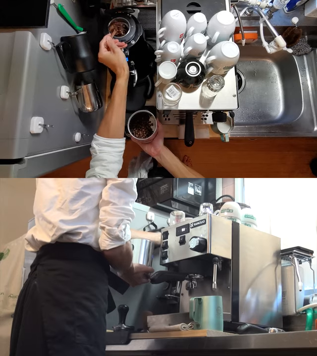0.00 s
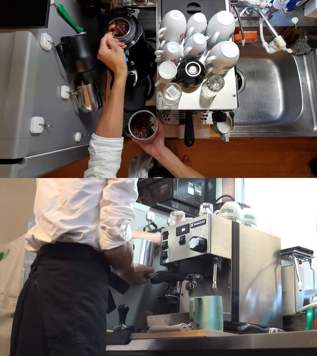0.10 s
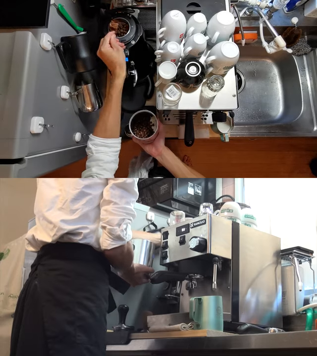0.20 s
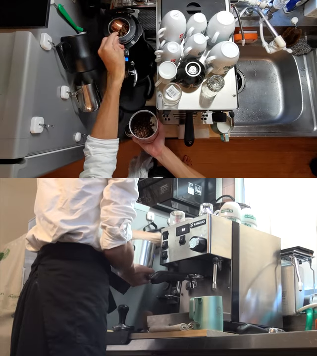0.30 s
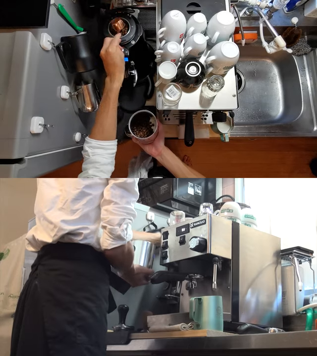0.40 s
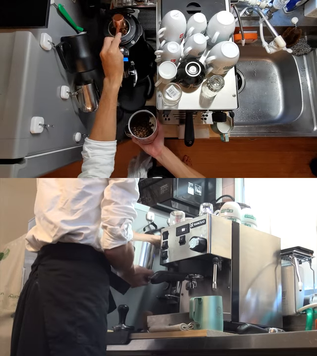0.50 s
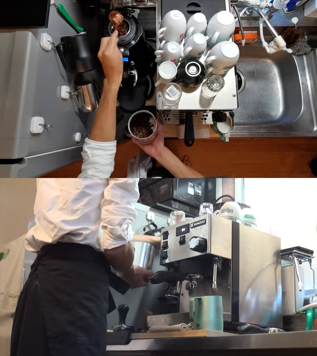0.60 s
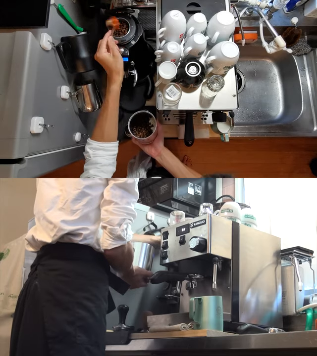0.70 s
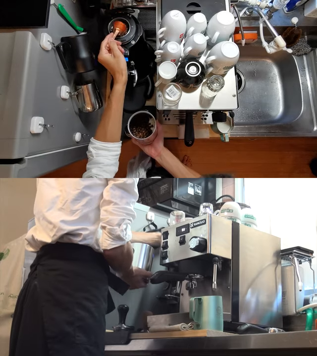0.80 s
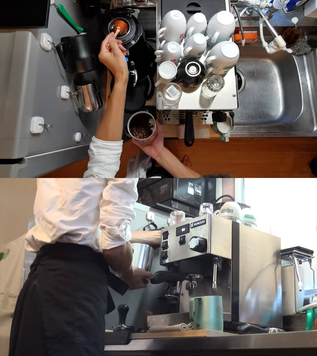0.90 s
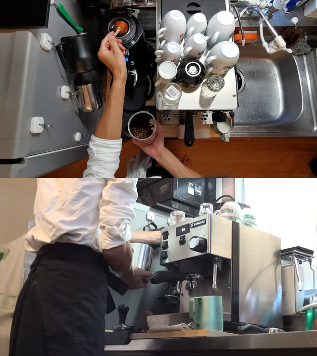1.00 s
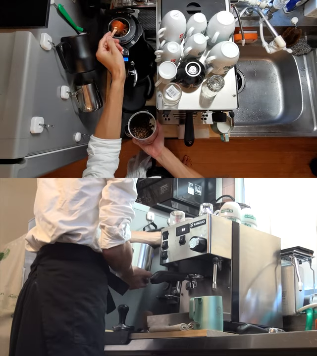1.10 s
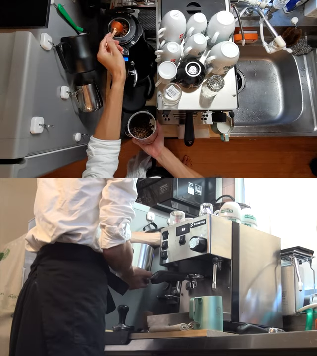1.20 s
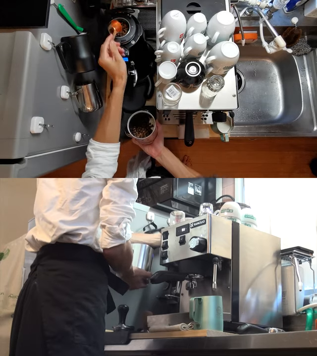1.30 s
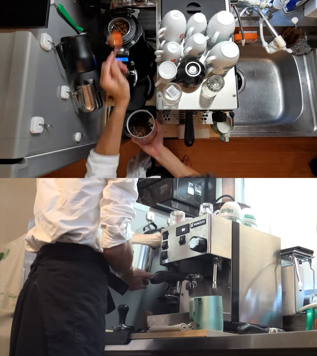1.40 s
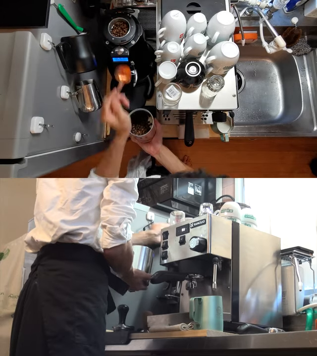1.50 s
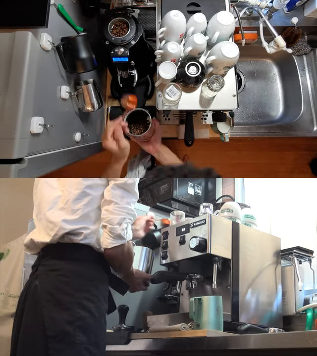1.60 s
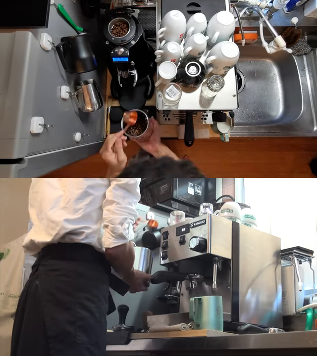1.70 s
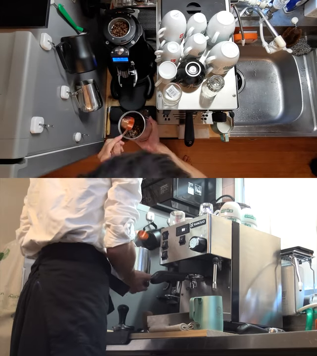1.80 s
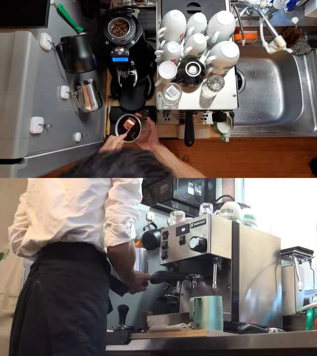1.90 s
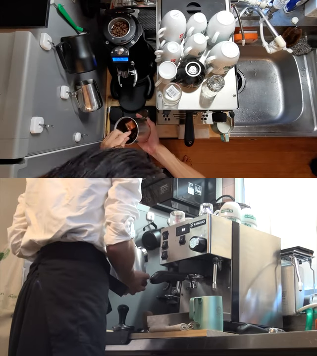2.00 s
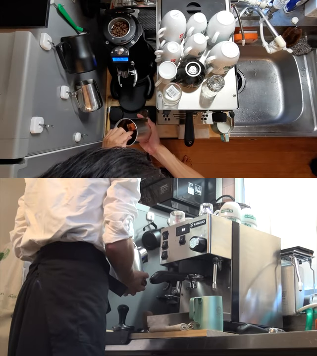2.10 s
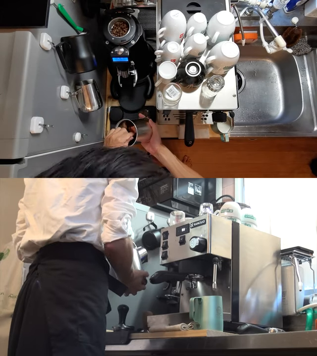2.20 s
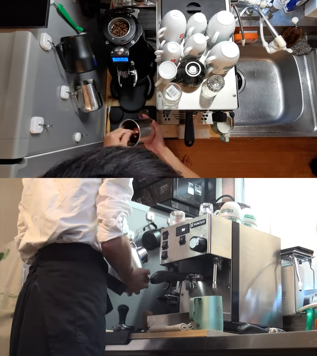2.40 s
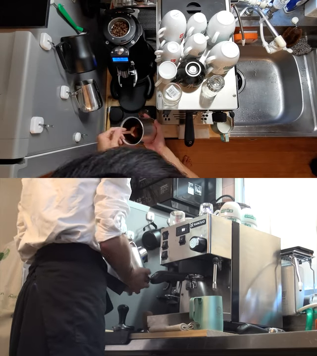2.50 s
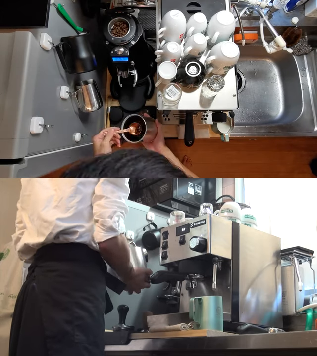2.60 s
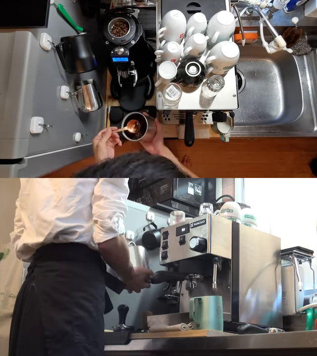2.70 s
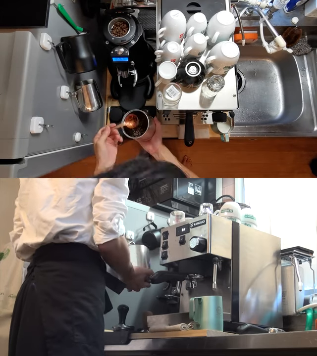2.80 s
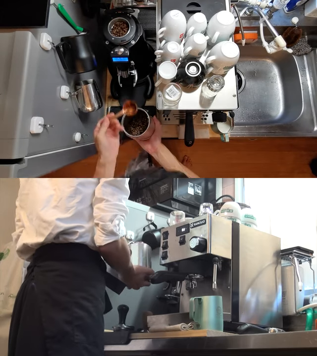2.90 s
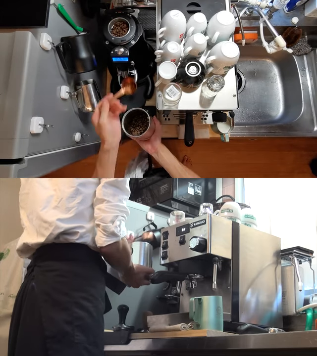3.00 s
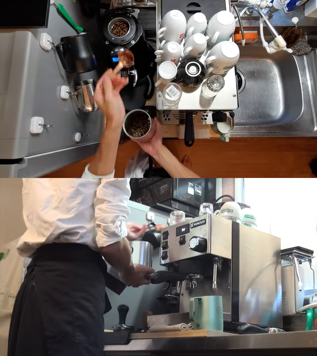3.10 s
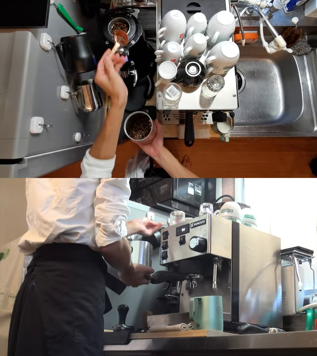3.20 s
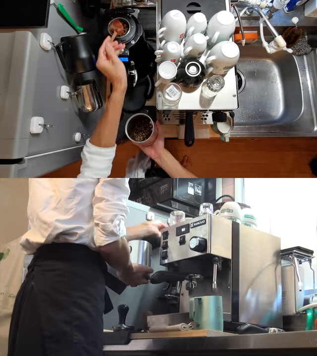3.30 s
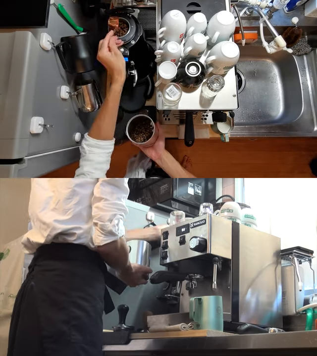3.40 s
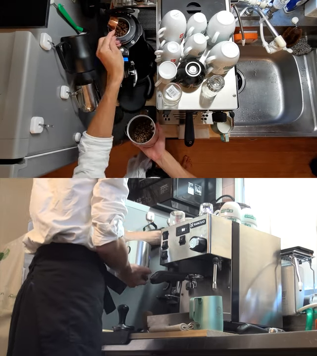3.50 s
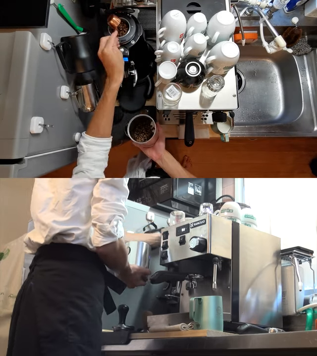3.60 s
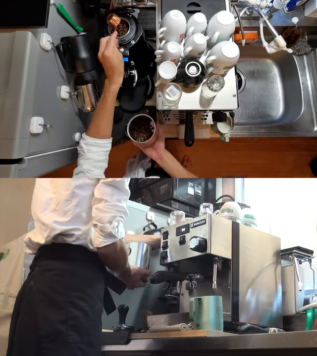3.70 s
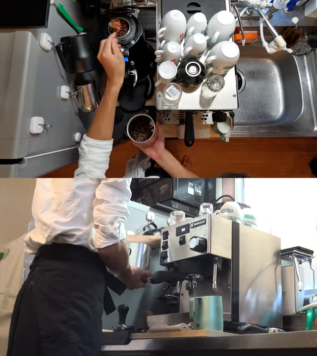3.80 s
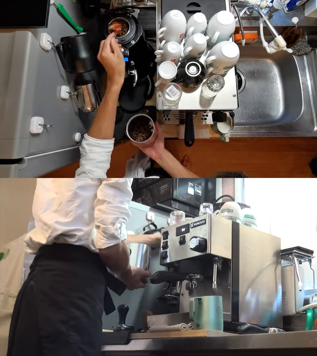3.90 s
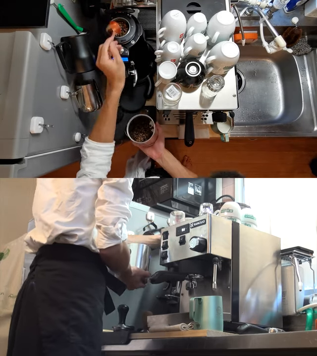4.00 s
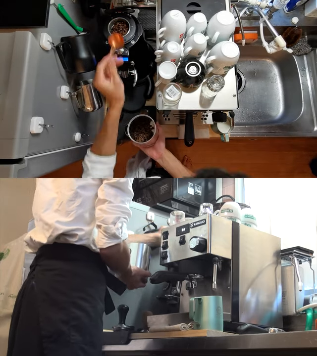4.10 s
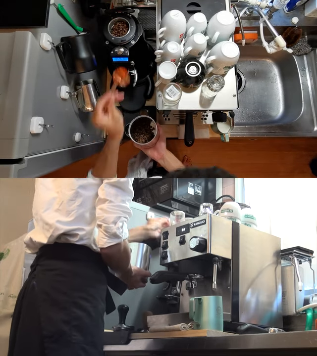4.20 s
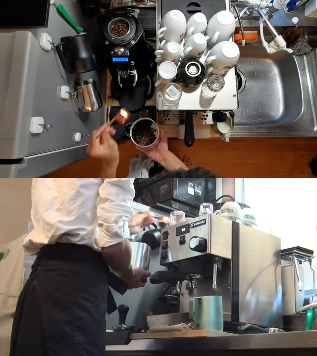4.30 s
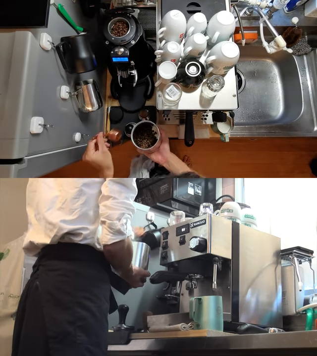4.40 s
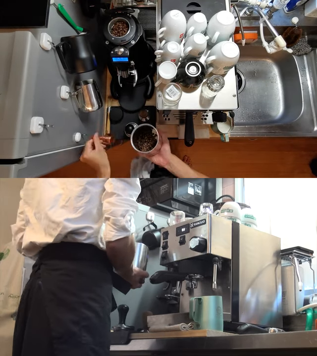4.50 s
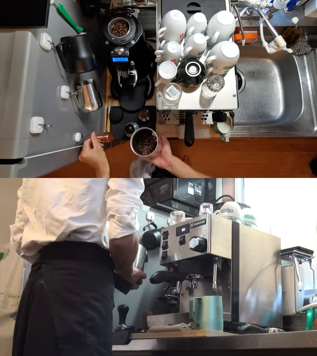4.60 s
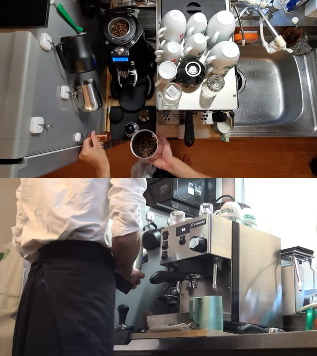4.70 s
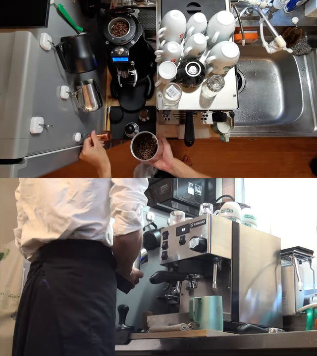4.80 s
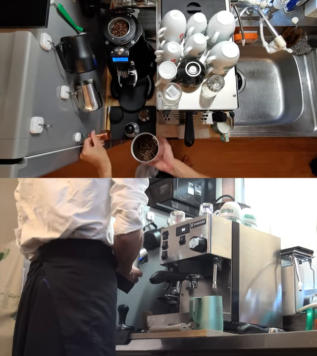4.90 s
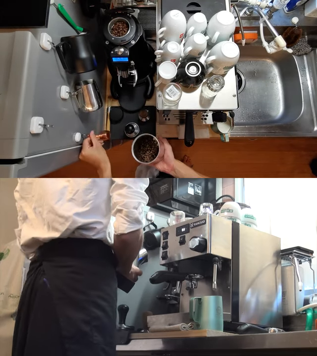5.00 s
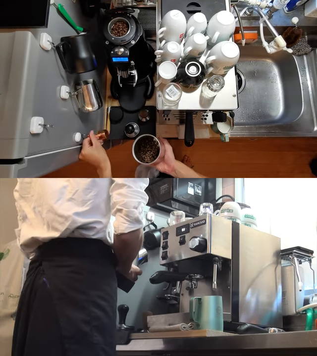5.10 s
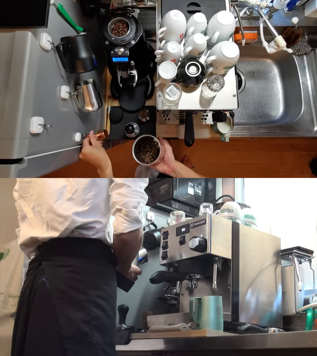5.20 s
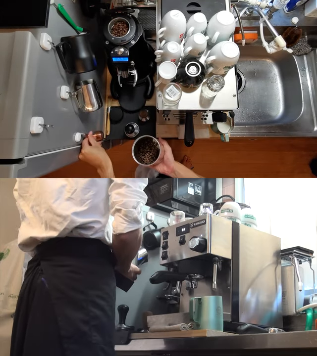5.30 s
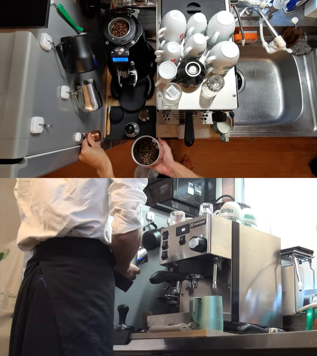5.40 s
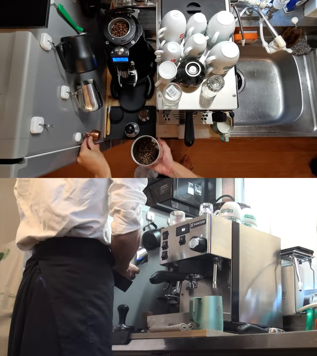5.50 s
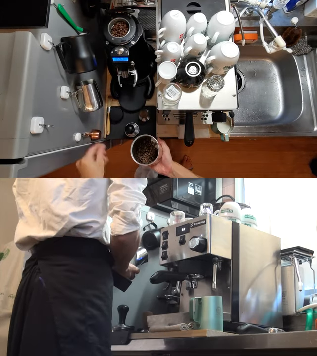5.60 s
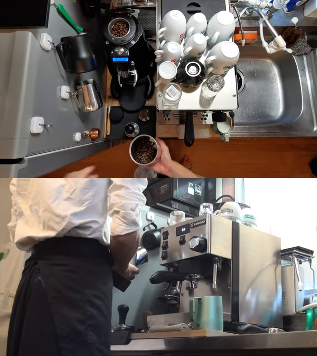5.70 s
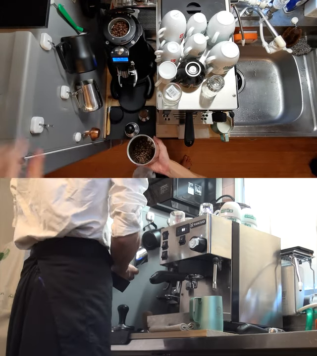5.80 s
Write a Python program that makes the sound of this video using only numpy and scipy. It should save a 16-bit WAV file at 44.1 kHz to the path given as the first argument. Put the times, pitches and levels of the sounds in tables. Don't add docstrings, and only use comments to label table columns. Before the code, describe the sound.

In a small hard-walled kitchen over a low machine rumble, a spoon knocks a plastic hopper and beans patter in. After a quiet gap with faint clinks, it digs crunchily into beans in a steel cup, rings on leaving, tips a faint second load, then cup and spoon are set down with a bouncing clatter. Close stereo microphones, short room echo.

```python
import sys
import numpy as np
from scipy import signal
from scipy.fft import rfft, irfft, next_fast_len
from scipy.io import wavfile
from scipy.ndimage import uniform_filter1d

SR = 44100
rng = np.random.default_rng(int(sys.argv[2]) if len(sys.argv) > 2 else 0)


def level_to_linear(level):
    exponent = np.asarray(level, float) / 20
    return 10 ** exponent


def waveform_to_disk(signal):
    frames = np.transpose(np.atleast_2d(signal))
    scaled = np.clip(frames, -1, 1) * 32767
    samples = np.round(scaled).astype(np.int16)
    wavfile.write(sys.argv[1], SR, samples)


N = 256220


def evened(x):
    return x / np.sqrt(np.mean(x ** 2) + 1e-20)


def read(points, hz):
    f, value = np.transpose(points)
    return np.interp(np.log(hz + 1), np.log(f + 1), value)


def add(mix, s, sound, pan_db):
    late = int(rng.integers(-1, 2))
    for ear, sign in enumerate((0.5, -0.5)):
        part = mix[ear, round(s * SR + sign * late):][:len(sound)]
        part += sound[:len(part)] * level_to_linear(sign * pan_db)


def resonate(x, hz, width):
    b, a = signal.iirpeak(min(hz, SR / 2.2), hz / width, SR)
    return signal.lfilter(b, a, x)


def ring(modes, blow=0.0001, rattle=0.19, stray=0.0091, uneven_db=2.5):
    hz, db, t60 = np.transpose(modes)[:, :, None]
    level_luck, pitch_luck = rng.standard_normal((2, len(modes), 1))
    t = np.arange(6000) / SR
    sign = (-1.0) ** np.arange(len(modes))[:, None]
    strength = sign * level_to_linear(db + uneven_db * level_luck - 60 * t / t60)
    free = (strength * np.sin(2 * np.pi * hz * (1 + stray * pitch_luck) * t)).sum(0)
    free *= 1 - np.exp(-t / blow)
    contact = rattle * rng.standard_normal(1000) * np.exp(-t[:1000] / 0.004) / np.sqrt(0.00061 * SR)
    contact[0] = 1
    return signal.fftconvolve(free, contact)


def crack(hz, share, last_s):
    t = np.arange(900) / SR
    burst = rng.standard_normal(len(t)) * np.exp(-t / last_s) * (1 - np.exp(-t / (0.34 * last_s)))
    width = hz * np.clip(1.68 * share, 0.05, 1.6)
    burst = resonate(resonate(burst, hz, width), hz, width)
    return level_to_linear(-5) * burst / abs(burst).max()


# (frequency [Hz], level [dB per Hz])
RUMBLE = [(19, -20), (32, -3.5), (49, -8), (86, -12.5), (129, -21), (160, -16.5), (183, -30), (226, -25),
          (259, -31.5), (288, -30), (750, -30), (1200, -51.5), (1560, -70), (2640, -120)]
# (frequency [Hz], level [dB per Hz])
HISS = [(590, -46), (1000, -12), (1380, -8.5), (2130, -7.5), (2980, -12), (3340, -14), (10100, -20.5),
        (10900, -16), (16000, -20.5)]
# (frequency [Hz], likeness [-1 to 1])
LIKENESS = [(60, 0.93), (180, 0.89), (550, 0.55), (1650, -0.16), (4970, 0.014), (15000, -0.17)]
# (frequency [Hz], left-right [dB])
LEAN = [(60, -1.5), (240, 0), (950, 6.5), (3770, 0.5), (15000, 5.5)]


def rumble():
    patchy_db, rumble_db, hiss_db = 1.6, -53.5, -73
    hz = np.fft.rfftfreq(2048, 1 / SR)
    a, b, c, d, patches = rng.standard_normal((N // 512 + 5, 1025, 5)).T
    patches = evened(uniform_filter1d(uniform_filter1d(patches, 30, 0), 8, 1))
    same = np.clip(read(LIKENESS, hz), -1, 1)[:, None]
    left = a + 1j * b
    right = same * left + np.sqrt(1 - same ** 2) * (c + 1j * d)
    lean = np.array([0.5, -0.5])[:, None, None] * read(LEAN, hz)[:, None]
    z = np.array([left, right]) * level_to_linear(patchy_db * patches + lean)
    out = np.zeros((2, N))
    for shape, db in ((RUMBLE, rumble_db), (HISS, hiss_db)):
        noise = signal.istft(z * level_to_linear(read(shape, hz))[:, None], nperseg=2048, noverlap=1536)[1]
        out += level_to_linear(db) * evened(noise[:, :N])
    return out


# (frequency [Hz], wander [Hz], level [dB])
MOTORS = [(39.15, 3.13, -51.5), (60.05, 4.89, -59)]


def drones():
    out = np.zeros(N)
    for hz, wander_hz, db in MOTORS:
        drift = evened(uniform_filter1d(uniform_filter1d(rng.standard_normal(N), 2500), 2500))
        tone = np.sin(2 * np.pi * np.cumsum(hz + wander_hz * drift) / SR)
        out += level_to_linear(db + 1 + 1.8 * drift[::-1]) * tone
    return out * level_to_linear(np.array([[-0.8], [0.8]]))


# (time [s], level [dB], left-right [dB])
KNOCKS = [
    (0.0849, -26, -1),
    (0.102, -38, 2),
    (0.117, -35, 12),
    (0.2374, -40, 2),
    (0.385, -37, -1),
    (3.7005, -50, -2),
]
# (frequency [Hz], level [dB], time to fade 60 dB [s])
HOPPER = [(653, -22, 0.078), (1050, -9.5, 0.015), (1810, -22, 0.0067), (2190, 0.5, 0.016), (2265, 4, 0.014),
          (2530, -4, 0.012), (2680, -8.5, 0.016), (3720, -2.5, 0.007), (4710, -10.5, 0.011)]


def hopper_knocks():
    out = np.zeros((2, N))
    for s, db, pan in KNOCKS:
        add(out, s, level_to_linear(db - 7) * ring(HOPPER, blow=0.0003, rattle=0.08, stray=0.006, uneven_db=0.6), pan)
    return out


# (time [s], level [dB], centre [Hz], width [share of centre], left-right [dB])
CLACKS = [(0.085, -25.5, 2150, 0.26, 0.5), (0.238, -35.5, 2220, 1, -3), (0.387, -38, 2400, 0.24, 3),
          (.386, -44, 1410, 0.27, 0), (2.425, -54, 810, 0.26, 7), (2.716, -47, 700, 0.076, 16),
          (4.829, -48.5, 1247, 0.15, -7.5), (5.123, -54.5, 950, 0.4, 12), (5.604, -31, 747, 0.16, 17),
          (5.668, -22.5, 1690, 0.3, 3), (5.669, -27, 2500, 0.52, -2), (5.686, -34, 2350, 0.61, 13)]


def clacks():
    out = np.zeros((2, N))
    for s, db, hz, share, pan in CLACKS:
        add(out, s, level_to_linear(db) * crack(hz, share, last_s=0.0034), pan)
    return out


# (time [s], frequency [Hz], level [dB], time to fade 60 dB [s])
PINGS = [(.126, 660, -49, .05), (.222, 3900, -47, .006), (.238, 2440, -47, .03), (.241, 4700, -58, .12),
         (.289, 4730, -64, .2), (.42, 4700, -63, .2), (.62, 3680, -58, .02), (.867, 114, -36, .05),
         (.872, 290, -40, .05), (.877, 1950, -54, .02), (1.038, 4720, -66, .2), (1.042, 290, -42, .06),
         (1.055, 550, -49, .1), (1.08, 2588, -70, .3), (2.308, 11100, -42, .03), (2.321, 11000, -44, .02),
         (2.334, 575, -35, .06), (2.425, 14300, -43, .015), (2.481, 9000, -48, .03),
         (2.545, 10800, -47, .02), (2.637, 10650, -45, .03), (2.643, 12400, -48, .025),
         (2.718, 3590, -31, .014), (2.746, 3590, -42, .015), (2.718, 583, -32, .08),
         (3.005, 14620, -47, .06), (3.61, 2350, -70, .3), (3.65, 5950, -59, .07), (3.71, 4646, -67, .15),
         (4.075, 2680, -72, .2), (4.076, 4710, -70, .12), (4.664, 1900, -50, .05), (4.67, 2120, -54, .04),
         (4.662, 7760, -52, .008), (4.826, 10220, -42, .012), (4.829, 4630, -51, .07),
         (4.83, 2350, -54, .04), (4.831, 265, -46, .09), (5.124, 10800, -51, .08), (5.123, 5300, -58, .04),
         (5.123, 7600, -55, .05), (5.124, 2650, -60, .04), (5.135, 560, -49, .06), (5.326, 15300, -58, .04),
         (5.34, 10100, -59, .06), (5.325, 1215, -56, .1), (5.345, 1200, -53, .1), (5.34, 600, -47, .05),
         (5.39, 3710, -60, .06), (5.39, 470, -52, .06), (5.605, 310, -28, .05), (5.61, 1890, -42, .06),
         (5.678, 555, -35, .05), (5.69, 345, -31, .09), (5.717, 4700, -48, .06)]


def pings():
    out = np.zeros((2, N))
    for s, hz, db, t60 in PINGS:
        cluster = 5 if t60 > 0.11 else 1
        stray = 0.002 * cluster ** 1.3
        modes = [(hz, db + 0.5, t60)] * cluster
        add(out, s, ring(modes, blow=0.0004, rattle=0.2, stray=stray, uneven_db=0), -1.5)
    return out


def bean_clicks():
    per_s, spread_db = 1600, 2.0
    size = level_to_linear(spread_db * np.minimum(rng.exponential(1, (2, N)), 2.9))
    hit = rng.random((2, N)) < per_s / SR
    return size * hit * rng.standard_normal((2, N))


# (start [s], hold [s], fade [dB per s], level [dB], top octave relative level [dB])
POURS = [(0.156, 0.064, 300, -61.5, -2), (0.215, 0.22, 127, -54.5, 7), (0.606, 0.1, 456, -61, 5.5),
         (1.04, 0.078, 115, -67.5, -26), (1.145, 0.062, 190, -63, 2.5), (1.382, 0.017, 288, -66.5, 5),
         (2.303, 0.015, 185, -42, -7), (2.325, 0.35, 702, -42.5, -8.5), (2.727, 0.0018, 896, -51, 4),
         (2.74, .01, 182, -83, -15), (3.695, 0.01, 209, -58.5, 10.5), (4.666, 0.0031, 500, -56, -0.5)]


def pouring_power():
    rise_s = 0.0069
    t, power = np.arange(N) / SR, np.zeros((2, N))
    for s, hold, fade, db, top in POURS:
        rise = np.clip((t - s) / rise_s, 0, 1)
        settle = level_to_linear(-abs(fade) * np.clip(t - s - rise_s - hold, 0, 1))
        power += (rise * settle * level_to_linear(np.array([[db], [db + top]]))) ** 2
    return power


# (frequency [Hz], level [dB per Hz])
BEANS = [(530, -38), (900, -10), (1070, -18), (2070, -0.5), (3150, -0.5), (5210, -1.5), (5970, -3.5),
         (6600, 4), (8000, -8.5), (10400, -18), (17600, -120)]


def tumbling_beans(clicks):
    grain_width, count = 0.3, 10
    kind = rng.integers(0, count, (2, N))
    fast = next_fast_len(N)
    hz = np.fft.rfftfreq(fast, 1 / SR)
    grains = 0
    for k, f in enumerate(np.geomspace(600, 16000, count)):
        grains = grains + rfft(clicks * (kind == k), fast) * np.exp(-(np.log((hz + 1) / f) / grain_width) ** 2)
    body = evened(irfft(grains * level_to_linear(read(BEANS, hz)), fast)[:, :N])
    treble = (hz < 16000) / (1 + (7500 / (hz + 1)) ** 8)
    chips = evened(irfft(grains * treble, fast)[:, :N])
    low, top = np.sqrt(pouring_power() + sliding_power())
    return level_to_linear(np.array([[0.25], [-0.25]])) * (low * body + top * chips)


# (time [s], level [dB], centre [Hz])
HOPPER_TICKS = [(0.186, -42, 8230), (0.224, -30.5, 13400), (0.252, -33, 11100), (0.395, -32, 13400),
                (0.461, -30, 11000), (0.53, -40.5, 13500), (0.715, -38.5, 14600), (1.037, -51, 4710),
                (1.153, -57, 10400), (1.393, -57, 10200), (1.607, -66, 5000), (1.885, -65, 5000)]


def hopper_ticks():
    out = np.zeros((2, N))
    for s, db, hz in HOPPER_TICKS:
        add(out, s, level_to_linear(db) * crack(hz, 0.43, last_s=0.0018), -3)
    return out


# (middle [s], half length [s], level [dB], top octave relative level [dB])
SLIDES = [
    (0.56, 0.078, -64, -20),
    (1.734, 0.16, -75.5, -4.5),
    (3.115, 0.094, -64.5, -13),
    (3.248, 0.072, -70.5, -3),
    (3.684, 0.055, -66, 6),
    (4.485, 0.14, -71, -2),
    (4.637, 0.015, -68, -18),
    (4.75, 0.05, -87, -10),
]


def sliding_power():
    t, power = np.arange(N) / SR, np.zeros((2, N))
    for s, half, db, top in SLIDES:
        swell = level_to_linear(-12 * np.minimum(abs(t - s) / half, 5) ** 2)
        power += (swell * level_to_linear(np.array([[db], [db + top]]))) ** 2
    return power


# (frequency [Hz], level [dB], time to fade 60 dB [s])
COUNTER_DEEP = [(107, -8, 0.042), (124, 1.5, 0.098), (166, -19, 0.11)]
# (frequency [Hz], level [dB], time to fade 60 dB [s])
COUNTER_HIGH = [(1146, -5, 0.013), (1454, -19, 0.013), (1690, 3.5, 0.0074), (1854, -4.5, 0.018),
                (2240, -7.5, 0.018), (2770, -20, 0.028), (3700, -8, 0.0063), (4670, -16, 0.0044)]


def strike_surface(blows, low):
    out = np.zeros((2, N))
    for s, db, deep, upper, pan in blows:
        thud = ring(COUNTER_DEEP, blow=0.016, stray=0.0058, uneven_db=2.8)
        add(out, s, level_to_linear(db + deep - 3) * thud, pan - 7)
        add(out, s, level_to_linear(db - 9) * ring(low, blow=0.00018, rattle=0.25, stray=0.011, uneven_db=0.5), pan)
        panel = ring(COUNTER_HIGH, blow=0.00017, rattle=0.25, stray=0.006, uneven_db=1.2)
        add(out, s, level_to_linear(db + upper - 3.5) * panel, pan)
    return out


# (time [s], level [dB], thud relative level [dB], upper relative level [dB], left-right [dB])
THUMPS = [(0.871, -39, 11, -30, 4), (1.04, -41, -3, -14, 4), (4.827, -41.5, -23, -13, 2.5),
          (5.118, -44, -13, -13, -3), (5.131, -41, -13, -23, 4.5), (5.15, -54, -8, -21, 0),
          (5.185, -48, -13, -23, 0), (5.216, -52, -13, -27, -1), (5.324, -53.5, -30, -15, -5),
          (1.075, -40.5, -11, -27, 2), (.905, -54, -20, -33, 7)]
# (frequency [Hz], level [dB], time to fade 60 dB [s])
COUNTER_LOW = [(188, -11, 0.075), (283, 3.5, 0.079), (343, 2, 0.051), (504, -2.5, 0.022), (535, -8.5, 0.16),
               (561.5, -2, 0.069), (700, -9.5, 0.078), (790, -11, 0.059), (970, -28, 0.033)]


def counter_thumps():
    return strike_surface(THUMPS, COUNTER_LOW)


# (time [s], main ring level [dB], upper rings relative level [dB], low ring relative level [dB])
CLINKS = [(1.0382, -62, -10, -3), (1.1534, -62, 7, -15), (1.1802, -51.5, -4, -25), (1.2557, -41, -11, -39),
          (1.3768, -60, 0, -19), (1.3961, -50, 3, -31), (1.4151, -46, -4, -32), (1.4495, -69, 13, -23),
          (1.8844, -82, -9, -3), (2.2998, -45.5, -14, -16), (2.81, -37.5, -40, -31),
          (2.8374, -34.5, -20, -27), (2.8644, -65, -17, -33), (3.0051, -32, -16, -32),
          (3.0445, -42, -13, -34), (3.062, -41, -14, -33), (3.1009, -57, -18, -24), (3.2011, -56, -18, -22),
          (3.256, -49, -30, -27), (3.602, -65, -2, -6), (3.6476, -75, -7, -6), (4.0746, -61.5, -6, -11),
          (4.8279, -38, -4, -37), (4.8474, -37, -28, -34), (5.124, -47, 0, -15), (5.3263, -46, -25, -32),
          (5.3921, -60, -20, -2), (5.618, -37.5, -29, -15), (5.64, -42, -32, -20), (5.671, -26, -16, -27),
          (5.684, -26.5, -17, -30), (5.732, -52, -17, -25)]
# (frequency [Hz], level [dB], time to fade 60 dB [s], ring 0 main, 1-2 upper, 3 low)
SPOON = [(6481, 0, .08, 0), (6535, -9, .06, 0), (5930, -22, .05, 0), (7600, -23, .05, 0),
         (10230, 0, .08, 1), (9884, -11, .05, 1), (10480, -5, .05, 1), (14620, 0, .07, 2),
         (15250, -11, .05, 2), (4660, -4, .04, 3), (2360, -10, .03, 3), (9100, -19, .04, 3)]


def spoon_clinks():
    grip = 0.7
    out = np.zeros((2, N))
    for s, db, upper, low in CLINKS:
        shares = [0, upper, upper - 7, low]
        modes = [(f, d + db - 5.5 + shares[int(k)], t60 * grip) for f, d, t60, k in SPOON]
        add(out, s, ring(modes, blow=0.00018, rattle=0.14, stray=0.0024, uneven_db=-3.6), 2.5)
    return out


# (time [s], level [dB], centre [Hz], left-right [dB])
CUP_TICKS = [(2.2568, -56, 5100, -2), (2.308, -44, 4940, -7), (2.3243, -30, 6260, -9),
             (2.3327, -24, 3590, -2), (2.3635, -33, 11000, 0), (2.4249, -26, 4570, -8),
             (2.48, -38, 11000, -4), (2.5088, -26, 13100, -2), (2.5312, -26, 5900, -7),
             (2.534, -24, 11000, 0), (2.343, -27, 12500, -2), (2.367, -27.5, 7950, 1), (2.44, -34, 5000, 1),
             (2.495, -30, 7500, -3), (2.5932, -31, 5500, 0), (2.6361, -31, 6000, -1),
             (2.6424, -24, 3740, -2), (2.6974, -48, 3500, -5), (2.7172, -22, 4300, 2.5),
             (2.7245, -38, 14000, -8), (2.7985, -44, 6200, -8), (2.837, -54, 10000, -20),
             (2.9102, -53, 14000, -2), (2.9311, -57, 8900, -12), (2.958, -52, 9000, 0),
             (2.9661, -48, 11900, -4), (3.003, -43.5, 13900, -4), (3.001, -53.5, 3440, -1),
             (3.033, -48, 12500, -5), (3.047, -43, 11000, 0)]


def cup_ticks():
    out = np.zeros((2, N))
    for s, db, hz, pan in CUP_TICKS:
        add(out, s, level_to_linear(db) * crack(hz, 0.64, last_s=0.0034), pan)
    return out


# (time [s], level [dB])
CUP_HUM = [(2.29, -55), (2.335, -38.5), (2.398, -86), (2.424, -35), (2.5, -63), (2.702, -47), (2.726, -73),
           (2.802, -77), (2.88, -101)]


def cup_hum(clicks):
    hum = evened(resonate(resonate(clicks[0], 606, 124), 605, 130))
    s, db = np.transpose(CUP_HUM)
    strength = level_to_linear(np.interp(np.arange(N) / SR, s, db - 6.5, -150, -150))
    return strength * hum * level_to_linear(np.array([[3.0], [-6.0]]))


# (time [s], cup air level [dB], wall relative level [dB], left-right [dB])
DIGS = [
    (2.334, -39, 6, -2.5),
    (2.364, -63, -7, -13.5),
    (2.424, -27, -7, -2.5),
    (2.534, -38.5, -2, -4),
    (2.59, -38.5, -15, -2),
    (2.644, -34, 3, 1.5),
    (2.691, -43, 6, -5),
    (2.719, -40, 19.5, -21),
]
# (frequency [Hz], level [dB], time to fade 60 dB [s])
CUP_AIR = [(571, -4.5, 0.041), (646, -17, 0.044), (470, -26, 0.06)]
# (frequency [Hz], level [dB], time to fade 60 dB [s])
CUP_WALL = [(1650, 1.5, 0.0069), (2160, 0, 0.0063), (3590, -23, 0.0035), (5000, -3, 0.0027),
            (5500, 2, 0.0057)]


def cup_digs():
    out = np.zeros((2, N))
    for s, db, wall, pan in DIGS:
        add(out, s, level_to_linear(db + 1.5) * ring(CUP_AIR, blow=0.0012, stray=0.008, uneven_db=1), pan + 9)
        add(out, s, level_to_linear(db + wall - 8) * ring(CUP_WALL, blow=0.00032, rattle=0.42, stray=0.0086), -1.5)
    return out


# (time [s], level [dB], centre [Hz], left-right [dB])
LATE_TICKS = [(3.602, -53, 5860, -7), (3.704, -39.5, 8340, -10), (3.7141, -40, 12900, 4),
              (4.073, -54, 4920, -16), (4.662, -31, 5270, -0.5), (4.8174, -41, 6000, -10),
              (4.8274, -28.5, 6770, 8), (5.0094, -64, 6520, 2.5), (5.1215, -33.5, 7400, -5.5),
              (5.3255, -44.5, 6800, -6), (5.325, -65, 13600, -7), (5.39, -45, 5960, -2),
              (5.6038, -34.5, 8500, -2), (5.668, -23.5, 6800, -10), (5.6705, -24, 12000, 2),
              (5.673, -28, 9800, 14)]


def late_ticks():
    out = np.zeros((2, N))
    for s, db, hz, pan in LATE_TICKS:
        add(out, s, level_to_linear(db) * crack(hz, 0.67, last_s=0.00067), pan)
    return out


# (time [s], level [dB], thud relative level [dB], upper relative level [dB], left-right [dB])
LANDINGS = [
    (5.604, -19.5, -11, -7, -3),
    (5.622, -28.5, -20, -8, 0),
    (5.669, -21.5, -17, -2.5, 2),
    (5.676, -29.5, -20, -24, 3),
    (5.684, -29, -25, -10, 3),
    (5.697, -31, -27, -22, -1),
]
# (frequency [Hz], level [dB], time to fade 60 dB [s])
BOARD = [(189, -8, 0.13), (226, -6.5, 0.16), (282, -4.5, .05), (341, 2, 0.11), (462, -7, 0.053),
         (522, -1.5, 0.039), (602, -4.5, .06), (700, -9, 0.097), (785, -6, .045), (875, -11, 0.076),
         (1000, -15, 0.044)]


def board_landings():
    return strike_surface(LANDINGS, BOARD)


# (frequency [Hz], level [dB], time to fade 60 dB [s])
SCOOP = [(13120, 0, .07), (15060, 3, .1), (10690, -12, .05), (12280, -15, .06), (8100, -16, .07),
         (11060, -16, .07)]


def spoon_drop():
    out = np.zeros((2, N))
    add(out, 5.669, level_to_linear(-37) * ring(SCOOP, blow=0.0025, stray=0.0008, uneven_db=0), -2.5)
    return out


# (frequency [Hz], time to fade 60 dB [s])
ROOM = [(200, 0.19), (600, 0.4), (1500, 0.39), (3000, 0.36), (8000, 0.26), (15000, 0.19)]


def room(x):
    taps = np.zeros((6, SR // 3))
    at = np.arange(90, SR // 3 - 16, 16) + rng.integers(0, 16, (6, (SR // 3 - 91) // 16))
    np.put_along_axis(taps, at, rng.choice([-1.0, 1.0], at.shape), 1)
    hz, t, z = signal.stft(taps, SR, nperseg=256)
    shared = 1 / (1 + (hz[:, None] / 700) ** 3)
    z[1::2] = shared * z[::2] + np.sqrt(1 - shared ** 2) * z[1::2]
    tail = signal.istft(z * level_to_linear(-60 * t / read(ROOM, hz)[:, None]), SR, nperseg=256)[1]
    tail /= np.linalg.norm(tail, axis=1)[:, None]
    turn = np.pi * 2.3 * np.arange(N) / SR
    out = np.zeros((2, N))
    for k in range(3):
        sent = x * np.sqrt(2 / 3) * np.cos(turn + k * np.pi / 3)
        out += signal.fftconvolve(sent, tail[2 * k:2 * k + 2], axes=1)[:, :N]
    return out


# (time [s], level [dB])
DISTANCE = [(0, -3.5), (.2, -0.5), (.8, -1.5), (1.12, -4), (1.3, 2.5), (2.3, -1), (2.43, -2.5), (2.7, -1),
            (2.72, -3.5), (2.8, -7), (3.3, 1), (4.5, -3), (5.0, 2), (5.5, -0.5), (5.6, -3), (5.8, -1.5)]


def scene():
    floor = rumble() + drones()
    clicks = bean_clicks()
    near = level_to_linear(-7) * (tumbling_beans(clicks) + cup_hum(clicks))
    near += hopper_knocks() + clacks() + hopper_ticks() + counter_thumps() + spoon_clinks()
    near += cup_ticks() + cup_digs() + late_ticks() + board_landings() + spoon_drop()
    close = pings()
    share = level_to_linear(np.interp(np.arange(N) / SR, *np.transpose(DISTANCE)))
    echoes = level_to_linear(3) * room((near + level_to_linear(-4) * close) * share)
    return near + close + echoes + floor


def top_cut(x):
    return signal.sosfilt(signal.butter(12, 16830, fs=SR, output="sos"), x)


def record(dry):
    edge = signal.firwin(401, 15820, fs=SR)[None]
    mix = signal.oaconvolve(dry, edge, "same")
    return top_cut(mix)


dry = scene()
out = record(dry)
waveform_to_disk(out)
```